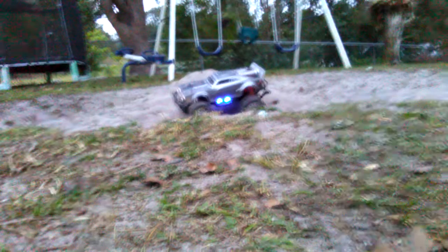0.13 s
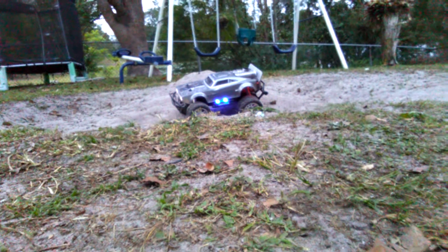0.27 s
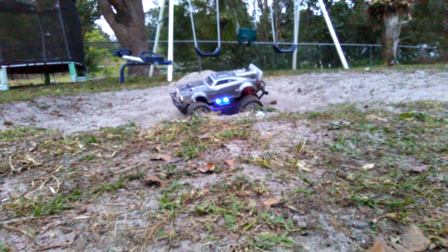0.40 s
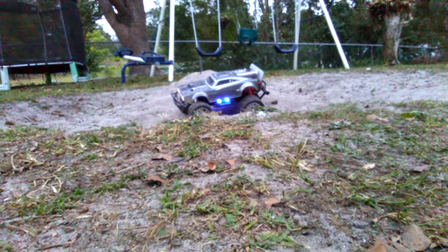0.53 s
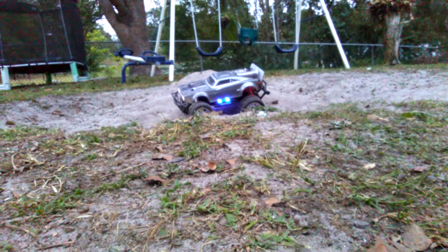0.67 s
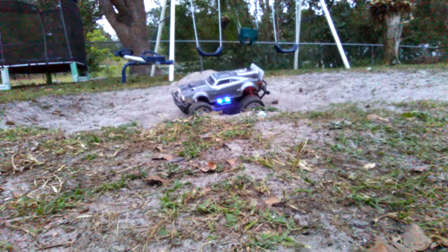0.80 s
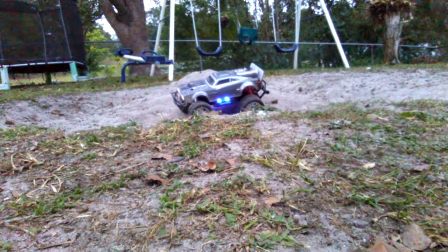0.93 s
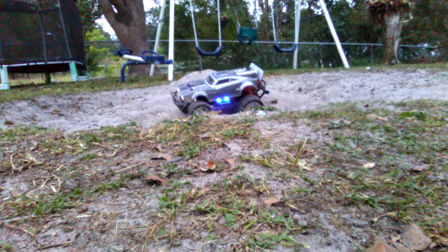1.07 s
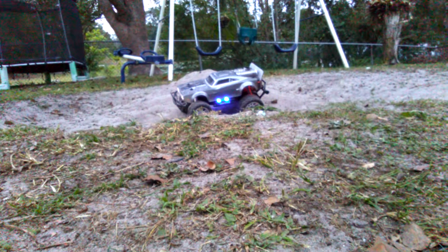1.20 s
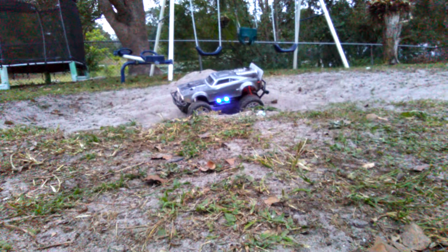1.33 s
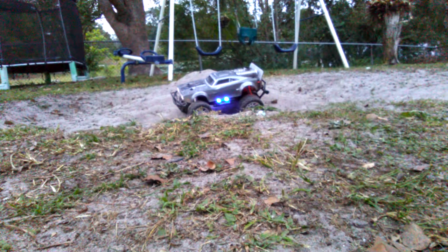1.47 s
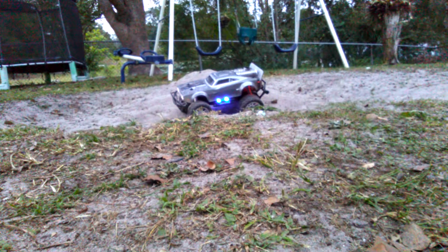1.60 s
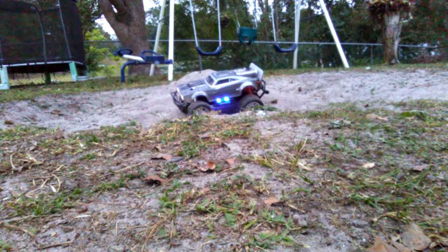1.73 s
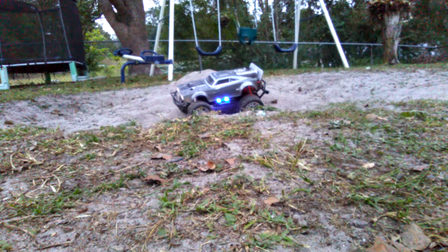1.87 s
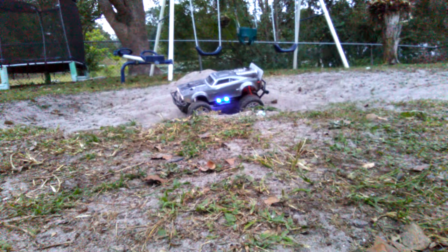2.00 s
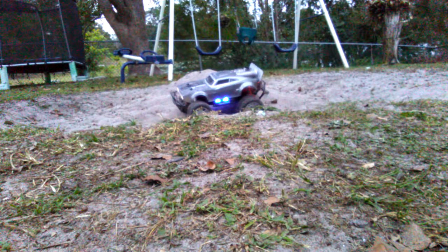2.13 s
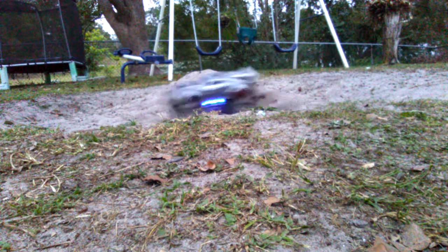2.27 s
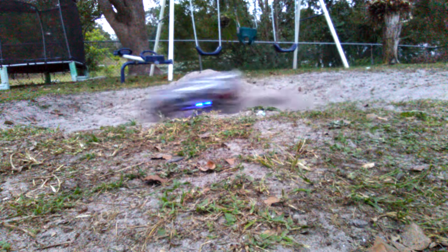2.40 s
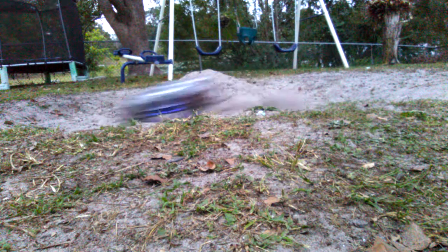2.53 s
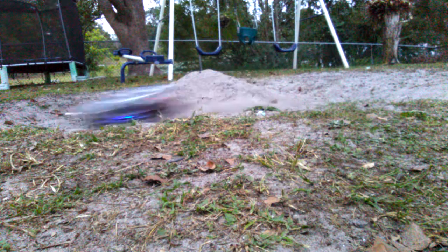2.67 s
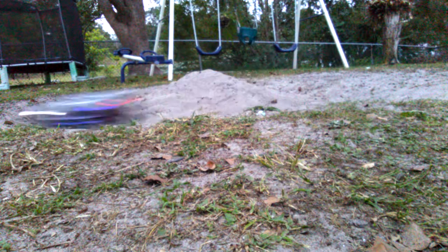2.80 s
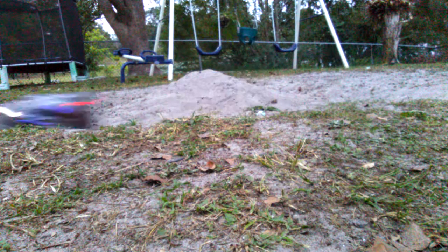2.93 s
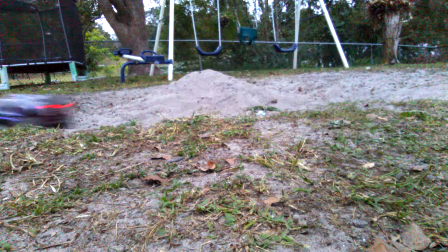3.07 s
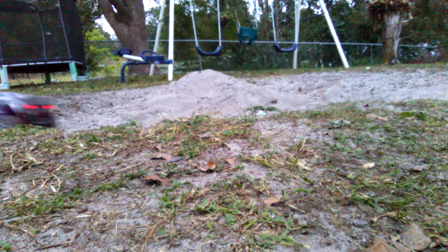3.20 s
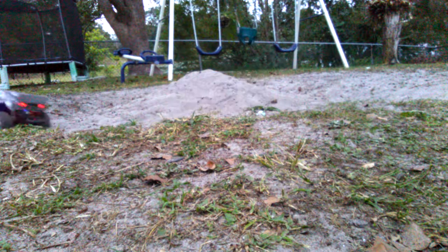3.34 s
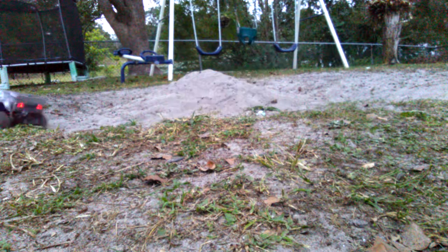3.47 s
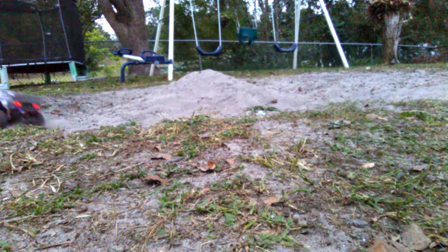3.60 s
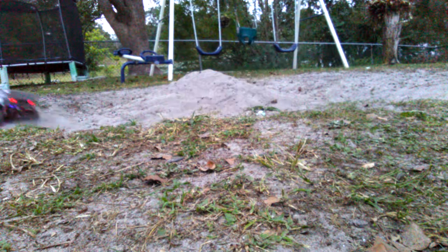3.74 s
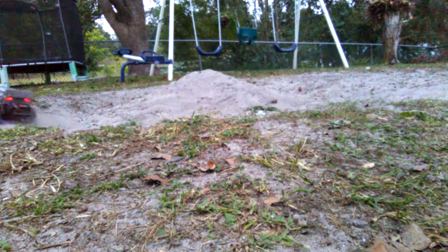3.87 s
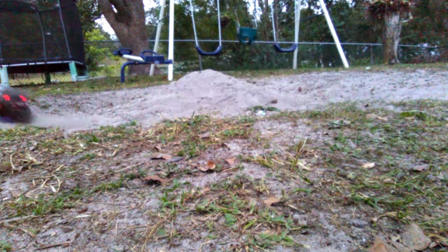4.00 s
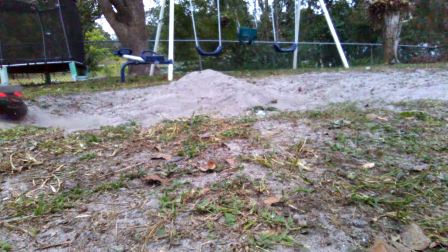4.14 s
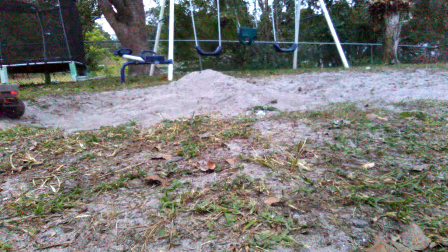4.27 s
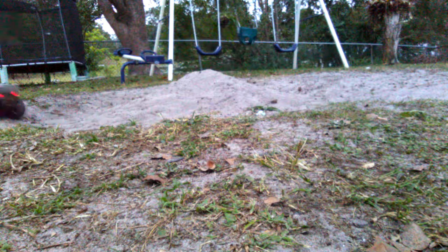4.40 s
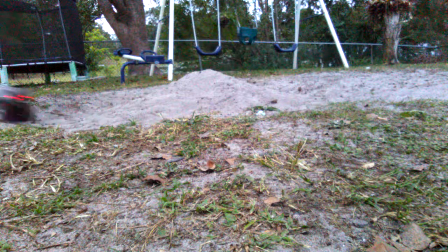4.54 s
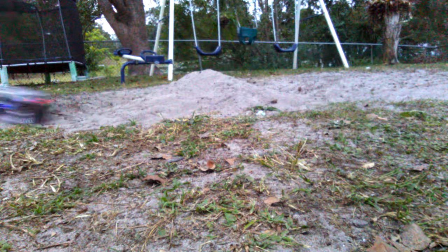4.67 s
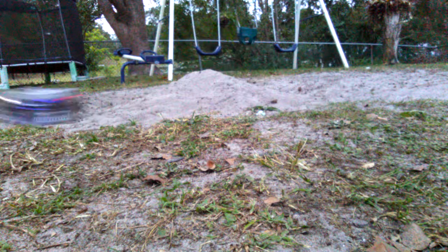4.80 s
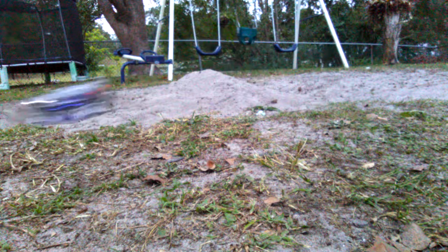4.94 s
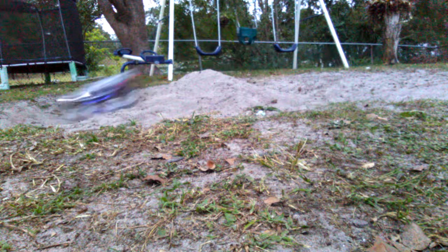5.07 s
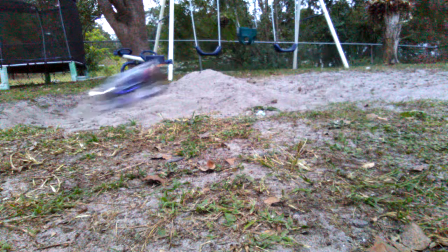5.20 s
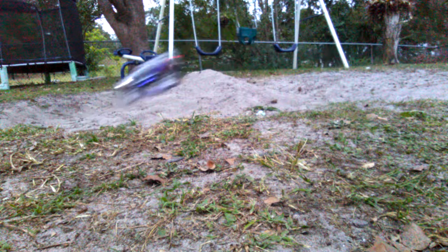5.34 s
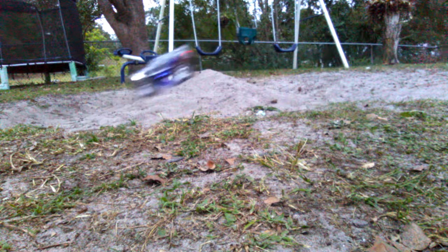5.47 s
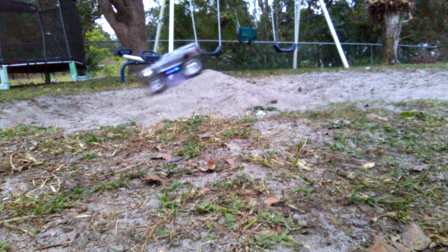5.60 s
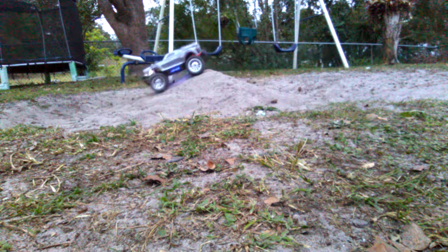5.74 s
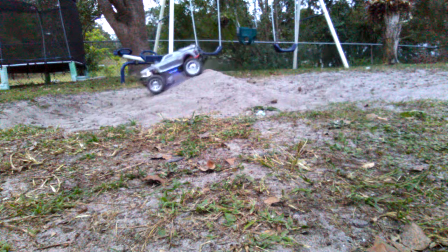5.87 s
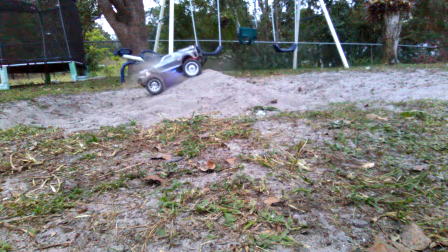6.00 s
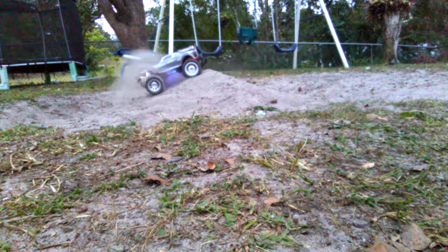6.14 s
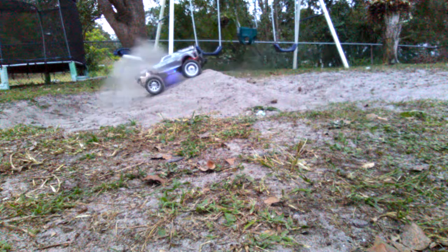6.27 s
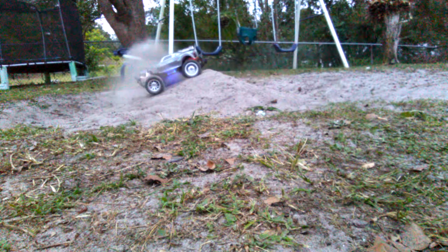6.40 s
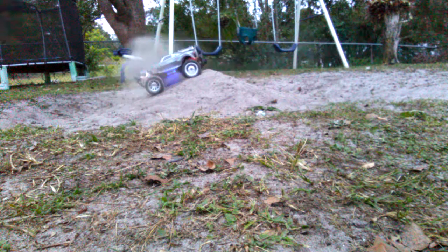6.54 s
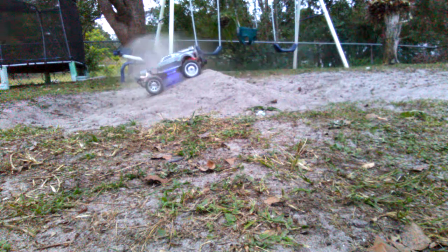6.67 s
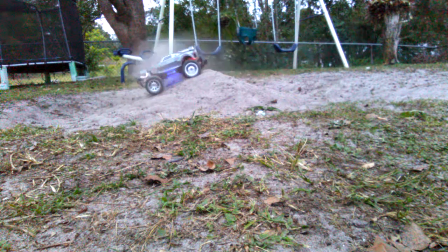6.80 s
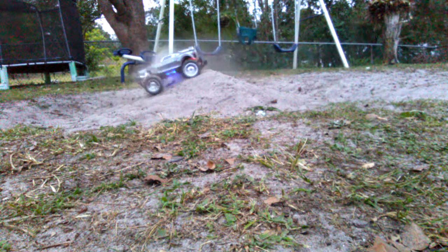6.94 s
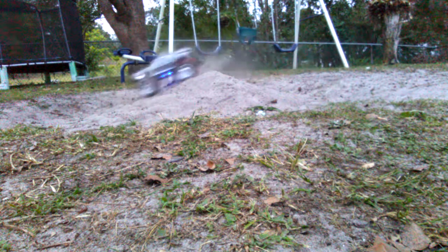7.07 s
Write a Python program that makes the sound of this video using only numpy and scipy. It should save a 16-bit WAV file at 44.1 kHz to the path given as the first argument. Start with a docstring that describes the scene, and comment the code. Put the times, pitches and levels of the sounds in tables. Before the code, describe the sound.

Outdoors in a quiet garden, a handheld camera's lens mechanism ticks rapidly and its plastic case clicks close by. Then a small electric toy truck bursts into a raspy, rising gear whine, coasts down, and revs again, five times in all. Tyres scrub and spray sand; finally the wheels race on a mound with throbbing rattle and hollow slaps. Wind buffets the stereo microphone late on.

```python
"""A toy electric truck spins its wheels through loose sand in five bursts and ends on a mound, wheels racing.
Its meshing gears are sums of swept overtones, narrow-band rasp and rattle that follow the motor's speed.
Coloured noise makes the tyres' scrub, slap and spray; delay and diffuse echoes place the truck outdoors.
Near at hand a camera's lens drive ticks and its plastic case clicks, as impulses exciting resonances.
Wind buffets the two microphone ports and the garden adds a steady hush, both from coloured noise."""
import sys
import numpy as np
from scipy import signal
from scipy.fft import rfft, irfft, next_fast_len
from scipy.io import wavfile
from scipy.ndimage import uniform_filter1d, map_coordinates

SR = 44100
rng = np.random.default_rng(int(sys.argv[2]) if len(sys.argv) > 2 else 0)


def to_wav(s):
    """Save 16-bit WAV."""
    ch = np.atleast_2d(s).T  # columns
    pcm = np.round(np.clip(ch, -1, 1) * 32767)  # PCM
    wavfile.write(sys.argv[1], SR, pcm.astype(np.int16))


N = 313992

# All levels in dB are relative: the functions add their own trims.

# The truck's five runs. Each row: throttle on in seconds, throttle off in seconds, slowing time constant
# in seconds, swell in dB per second, then drive, tyre scrub, sand spray and low gear note in dB.
RUNS = [(2.132, 2.837, 0.27, 3, -27.5, -45.5, -81, -45), (3.418, 3.999, 0.28, 5, -31.5, -45.5, -43, -46.5),
        (4.38, 5.582, 0.19, 6, -37.5, -45, -42, -53), (5.781, 6.822, .6, -12.5, -31, -43, -42.5, -47),
        (6.89, 7.118, 0.4, -12, -25, -45, -57, -52)]
# Motor speed under throttle, sagging where the tyres bite; one curve a run.
# Each row of a curve: time in seconds, gear mesh rate in Hz.
CRUISE = [
    [(2.25, 1658), (2.3, 1834), (2.32, 2088), (2.345, 2165), (2.375, 1983), (2.399, 2311), (2.42, 2382),
     (2.455, 1960), (2.495, 2234), (2.53, 2238), (2.585, 2449), (2.615, 2255), (2.675, 2314), (2.745, 1885),
     (2.82, 1754)],
    [(3.485, 1338), (3.52, 1396), (3.55, 1710), (3.605, 1862), (3.63, 2132), (3.662, 2153), (3.698, 1916),
     (3.722, 2198), (3.806, 2128), (3.86, 2445), (3.885, 2230), (3.915, 2270), (3.942, 2127)],
    [(4.455, 1467), (4.515, 1717), (4.6, 2127), (4.74, 2196), (4.82, 2290), (4.87, 2194), (5.03, 2398),
     (5.12, 2311), (5.28, 2370), (5.37, 2384), (5.43, 2180), (5.48, 2290), (5.525, 2340)],
    [(5.945, 2140), (6.01, 2359), (6.1, 2622), (6.56, 2875)],
    [(6.998, 1503), (7.04, 1745), (7.065, 1942), (7.093, 1970), (7.107, 2120)],
]
# How long the motor strains before it picks up. One value a run, in seconds.
STALL_S = [.027, .025, .015, .015, .048]
# How clearly the teeth sing, the harder they are pressed together. One value a run: whine re rattle in dB.
GRIP_DB = [7, 6, -11, -4, 6]
# Free wheelspin. Each row: time in seconds, share from 0 to 1.
SPIN = [(5.7, 0), (6.1, 0.7), (6.8, 1), (7, 0.29)]
# Overtones of the whine. Each row: multiple of the mesh rate, level in dB.
OVERTONES = [(2, 6), (3, 3.5), (4, -2), (5, -9), (6, -6)]
# How well the housing radiates an overtone sweeping past. Each row: frequency in Hz, gain in dB.
HOUSING_GAIN = [(2400, -26), (3650, -26), (3930, -10), (4200, -7), (4600, -8), (4900, -9.5), (5500, -6),
                (6200, -20), (7500, -35), (9000, -17), (11500, -34), (13500, -20)]
# High housing resonances set buzzing by hard-pressed teeth.
# Each row: frequency in Hz, width in Hz, level in dB.
BUZZ_MODES = [(6740, 500, 1), (8980, 370, 2.5), (10650, 800, -4.5), (13100, 1100, 0)]
# Colour of the gearbox rattle. Each row: frequency in Hz, level in dB.
GEARBOX_COLOUR = [(820, -41), (1400, -9), (1600, -69), (2260, -3.5), (2560, -19), (2830, -6.5),
                  (3540, -4.5), (4600, 4.5), (5380, 12), (5990, -8), (6410, -7), (10400, -19), (12000, -24),
                  (13700, -21), (14400, -30)]
# Colour of tyres scrubbing the ground. Each row: frequency in Hz, level in dB.
SCRUB_COLOUR = [(190, -6.5), (330, -10.5), (442, 3.5), (615, -3.5), (983, -2.5), (1460, -11), (1730, -18.5),
                (1900, -9.5), (2470, -17), (4180, -120)]
# Colour of tyres slapping the ground. Each row: frequency in Hz, level in dB.
SLAP_COLOUR = [(240, -42), (400, -34), (576, 3.5), (706, -0.5), (896, 4), (1080, -15), (1600, -20),
               (2080, -11), (3520, -120)]
# Colour of the flung sand. Each row: frequency in Hz, level in dB.
SPRAY_COLOUR = [(2500, -22), (5000, 10.5), (7500, 9.5), (10000, 4), (12500, 0), (14400, -51)]
# Racing tyres slap the mound. Each row: time in seconds, level in dB.
MOUND_SLAPS = [(5.947, -37.5), (6.04, -41), (6.241, -45), (6.274, -43), (6.318, -39), (6.351, -41),
               (6.424, -36), (6.462, -45), (6.499, -39), (6.576, -40.5), (6.601, -44), (6.665, -39.5),
               (6.708, -45), (6.765, -46), (6.808, -45), (6.909, -42.5), (6.947, -37)]
# The drive train takes up its slack. Each row: time in seconds, level in dB.
SLACK_CLACKS = [(2.139, -50), (3.442, -40), (4.418, -37), (5.79, -50), (6.932, -38)]
# Change of the truck's colour on the mound. Each row: frequency in Hz, gain in dB.
MOUND_COLOUR = [(1000, -1), (1500, -0.5), (2200, -6), (2900, 3), (3700, 5), (4400, 4), (5300, 2.5),
                (7000, 1), (13000, -0.5)]
# The truck's bearing. Each row: time in seconds, delay of the left port behind the right in samples.
BEARING = [(2.1, 1.9), (2.6, 3.6), (3.3, 8.55), (4.2, 11.06), (4.75, 8.84), (5.25, 5.5), (5.7, 2.64),
           (7.1, 2.87)]
# Moves of the lens drive. Each row: start in seconds, end in seconds, step in seconds,
# first tick in dB, following ticks in dB, ring re tick in dB.
LENS_MOVES = [(0.181, 0.2, .0355, -41, -41, 0), (0.219, 0.45, .0352, -37, -40, 0),
              (0.569, 0.66, .0372, -41, -37.5, 0), (0.682, 0.74, .037, -35, -37.5, 0),
              (0.7558, 1.18, .0368, -30.5, -39, -2), (1.193, 1.35, .035, -44, -43, -2),
              (1.367, 1.7, .0382, -36, -44.5, -1), (1.714, 2.93, .0382, -35, -45.5, 0),
              (2.942, 4.05, .0382, -38, -45, 0), (4.062, 4.15, .037, -35, -31, 5),
              (4.207, 4.38, .0342, -37, -39.5, 5)]
# Colour of a tick, shared by the clacks. Each row: frequency in Hz, level in dB.
TICK_COLOUR = [(1470, -55), (2500, -52), (3160, -22), (5000, -3.5), (5400, 4.5), (5930, -9), (8440, -9.5),
               (9480, -41), (10400, -19), (14400, -42)]
# Plastic clicks. Each row: time in seconds, then body, low knock, bright snap and lingering ring in dB.
CLICKS = [(0.1378, -47, -37, -19.5, -80), (0.1447, -62, -35.5, -47, -80), (1.09, -27, -53, -50, -62),
          (1.105, -29, -53, -55, -56), (1.125, -18.5, -54, -42, -56), (1.142, -24, -46, -44, -57),
          (1.754, -35, -69, -43, -80), (1.952, -40, -51, -51, -80), (1.969, -22, -35.5, -47, -63)]
# The plastic's resonances. Each row: frequency in Hz, width in Hz, level in dB.
PLASTIC_MODES = [(650, 350, -9), (970, 90, -5), (1200, 90, -9), (1770, 240, -3), (2780, 200, -10),
                 (4200, 350, 2)]
# The hard shell's bright resonances. Each row: frequency in Hz, width in Hz, level in dB.
SHELL_MODES = [(2600, 450, 2), (4020, 90, -9), (4650, 500, -7), (6500, 600, 2), (11500, 4000, -14)]
# Fingers settling on the case. Each row: time in seconds, rub in dB.
FINGERS = [(0, -47.5), (.2, -52.5), (.45, -58.5), (.6, -81)]
# A calm, then gusts. Each row: time in seconds, wind buffet in dB.
WIND_LEVEL = [(0, -57), (4.35, -55), (4.85, -40), (5.9, -37), (6.6, -51.5), (7.0, -42.5)]
# Colour of the wind buffet. Each row: frequency in Hz, level in dB.
BUFFET_COLOUR = [(12, -5), (20, 5), (49, 2.5), (129, -4), (325, -32.5), (450, -45), (580, -61), (990, -120)]
# Dull bumps on the microphone. Each row: time in seconds, level in dB.
BUMPS = [(4.886, -21.5), (4.897, -23), (5.178, -38), (5.428, -17.5), (5.543, -27.5), (5.66, -35.5),
         (5.861, -31.5), (5.919, -29), (6.041, -35)]
# Colour of the garden's hush. Each row: frequency in Hz, level in dB.
AIR_COLOUR = [(12, -47), (20, 1.5), (130, -5.5), (252, -8.5), (305, -16), (474, -12), (559, -16.5),
              (2340, -32.5), (4660, -32), (5350, -29), (10600, -41), (14400, -51)]
# Likeness of the hush at the two ports. Each row: frequency in Hz, left-right correlation.
AIR_ALIKE = [(60, 1), (140, 1), (300, 0.6), (700, 0.00074), (1500, 0)]
# The ports resonate differently. Each row: frequency in Hz, left minus right in dB.
PORTS = [(500, -0.5), (3600, 1.5), (4200, 1.5), (4800, 18), (5450, 10), (6200, 7), (7500, -4.5),
         (9300, 4.5), (12300, -1), (14000, -9)]

START_HZ, FULL_HZ = 743.5, 2305  # gear mesh rate as the truck jerks off, and the reference for full speed
BITE_HZ, BITE_WIDTH_HZ = 1935, 40  # above this mesh rate the gears dig in and sing
BITE_DRIVE_DB, BITE_WHINE_DB, BITE_SPRAY_DB = 3, 5, 3.5  # what each sound lacks below it
DRIVE_SLOPE_DB, SCRUB_SLOPE_DB, SPRAY_SLOPE_DB = 7, 2, 6  # growth with motor speed, dB per octave
GEAR_ATTACK_S, TYRE_ATTACK_S = 0.026, 0.023
GEAR_RELEASE_DB, TYRE_RELEASE_DB = 160, 100  # decay after the throttle is let go, dB per second
EASE_DB, EASE_S = 5, 0.014  # the gears unload as the motor starts to slow
COAST_DB, SLIP_DB = 11, 11  # whine lost when the motor coasts, and when the wheels spin free
RASP_DB, RATTLE_DB = -8.5, -1.5
RASP_RATE = 260  # knots per second per overtone number; more knots widen the rasp
CLEAR_HZ = 5900  # overtones above this lose their clear pitch
THROB_DB = 4.2  # swing of the throb at full wheelspin
SLAP_S = 0.0066  # time constant of a slap's bell-shaped envelope
TYRE_HZ, TYRE_RISE_HZ_PER_S = 871, 40  # the hollow tyre's note climbs as it stretches
CLIMB_AT_S, CLIMB_S = 5.07, 0.21  # start and length of the climb onto the mound
LENS_FADE_DB = 5  # softening of the ticks through a move, dB per second
RING_HZ, RING_T60 = 838, 0.3  # the case's lingering mode, and its decay in seconds
TOP_HZ = 14350  # band limit


def amp(db):
    """Level law: decibels to amplitude gain."""
    return 10 ** (np.asarray(db) / 20)


def unit(x):
    """Power normalisation: scale to rms 1."""
    return x / np.sqrt(np.mean(x ** 2) + 1e-20)


def along(points, hz):
    """Logarithmic frequency scale: interpolate (Hz, value) points along it."""
    f, v = np.transpose(points)
    return np.interp(np.log(hz + 1), np.log(f + 1), v)


def curves(rows):
    """Linear interpolation: one value per sample for each column after the time."""
    s, *cols = np.transpose(rows)
    return [np.interp(np.arange(N) / SR, s, c) for c in cols]


def wobble(rate):
    """Band-limited fluctuation: a smooth random curve with rate knots a second."""
    knots = rng.standard_normal(int(N * rate / SR) + 4)
    return map_coordinates(knots, [np.arange(N) * rate / SR])


def filtered(x, response):
    """Linear filtering: multiply the spectrum of x by a function of frequency."""
    m = next_fast_len(N + SR // 2)
    return irfft(rfft(x, m) * response(np.fft.rfftfreq(m, 1 / SR)), m)[..., :N]


def coloured(x, spectrum):
    """Spectral shaping: x with a (Hz, dB) colour, at rms 1."""
    return unit(filtered(x, lambda hz: amp(along(spectrum, hz))))


def noise(spectrum):
    """Random excitation: coloured noise of rms 1."""
    return coloured(rng.standard_normal(N), spectrum)


def ringing(x, modes):
    """Modal superposition: x through parallel (Hz, width in Hz, dB) resonances."""
    def response(f):
        return sum(amp(db) * 1j * f * width / (centre * centre - f * f + 1j * f * width)
                   for centre, width, db in modes)
    return filtered(x, response)


def bursts(times, levels_db, t60):
    """Exponential damping: jump at each time, then lose 60 dB in t60 seconds."""
    positions = np.clip(np.asarray(times) * SR, 0, N - 1).astype(int)
    hits = np.bincount(positions, amp(levels_db), N)
    return signal.lfilter([1], [1, -amp(-60 / (t60 * SR))], hits)


def diffuse_tail(t, t60):
    """Diffuse reflection: decaying noise, independent at each port."""
    return rng.standard_normal((2, len(t))) * amp(-60 * t / t60)


def scattered_by(x, tail):
    """Convolution with an echo tail of unit energy at each port."""
    tail = tail / np.linalg.norm(tail, axis=1, keepdims=True)
    return signal.fftconvolve(x[None], tail, axes=1)[:, :N]


def gears(jitter=.012, flutter_db=3.3, note_db=-1, shaft_db=-18.5, knock=0.36, chatter_db=1.5, buzz_db=-19):
    """Gear meshing: tooth contacts whine and rasp, and backlash rattles once a turn of the five-tooth pinion."""
    mesh_hz, level, grip, note = gear_controls()
    # play between the teeth scatters their timing, which blurs the high overtones into hiss
    slop = .17 * wobble(1400)
    # lightly pressed teeth run less evenly, so the whine breaks into strands
    uneven = jitter * np.clip(amp(-.7 * grip), .7, 2.2)
    mesh = 2 * np.pi * np.cumsum(mesh_hz * (1 + uneven * wobble(200))) / SR + slop
    shaft = mesh / 5
    # an off-centre pinion presses harder once a turn, which puts sidebands on the whine
    press = 1 + knock * np.cos(shaft)
    # a labouring motor makes the whine stutter
    stutter_db = 3.5 * below_speed(mesh_hz)

    def partial(k):
        """Amplitude modulation: a clear overtone that flutters, stutters and follows the press."""
        tone = unit(np.sin(k * mesh) * press * amp(flutter_db * wobble(130)))
        return tone * amp(stutter_db * (wobble(70) - 1.0))

    def rasp(k, rate):
        """Narrow-band noise: gritty teeth smear an overtone into a band that follows the motor."""
        return unit(np.sin(k * mesh) * wobble(rate) + np.cos(k * mesh) * wobble(rate))

    whine = np.zeros(N)
    for k, db in OVERTONES:
        clear = 1 / (1 + (k * mesh_hz / CLEAR_HZ) ** 12)
        singing = amp(grip) * clear * partial(k)
        rough = amp(RASP_DB + grip / 2) * rasp(k, k * RASP_RATE)
        whine += amp(db + along(HOUSING_GAIN, k * mesh_hz)) * (singing + rough)

    backlash = coloured(rng.standard_normal(N) * press * amp(chatter_db * wobble(300)), GEARBOX_COLOUR)
    rattle = amp(RATTLE_DB) * backlash * wheel_throb()
    buzz = ringing(rng.standard_normal(N) * press, BUZZ_MODES)
    buzz = amp(buzz_db + grip) * unit(filtered(buzz, lambda hz: hz > CLEAR_HZ))
    drive = amp(level) * (whine + buzz + rattle) / np.sqrt(1 + amp(grip) ** 2)

    # the rotor's imbalance hums at the shaft rate and its octave, growing steeply with speed
    hum = np.sin(shaft) + .25 * np.sin(2 * shaft)
    hum = unit(hum * amp(flutter_db * wobble(50)) * (1 + curves(SPIN)[0] * wobble(120)))
    hum = hum * np.clip(mesh_hz / 2100, 0, 1) ** 6
    # the low note, at the mesh rate itself, grows raspier with speed
    roughness = .9 * np.clip(mesh_hz / FULL_HZ, 0, 1) ** 2
    low = unit(partial(1) + roughness * rasp(0.95, 2 * RASP_RATE))
    return drive + amp(note + note_db) * low + amp(.5 * (level - 25.5) + shaft_db) * hum


def gear_controls():
    """Load and speed dependence: mesh rate in Hz, then drive, whine re rattle and low note in dB."""
    mesh_hz, eased = motor()
    spin, = curves(SPIN)
    age, released, swell, drive, _, _, note, grip = current_run()
    octaves = np.log2(mesh_hz / FULL_HZ)
    slow = below_speed(mesh_hz)
    attack = 20 * np.log10(1 - np.exp(-age / GEAR_ATTACK_S) + 1e-6)
    gate = attack - GEAR_RELEASE_DB * released - EASE_DB * eased
    drive_db = drive + swell * age + DRIVE_SLOPE_DB * octaves - BITE_DRIVE_DB * slow + gate
    whine_db = grip - BITE_WHINE_DB * slow - SLIP_DB * spin ** 4 - COAST_DB * eased
    note_db = note - COAST_DB * eased - SLIP_DB * spin + gate
    return mesh_hz, drive_db, whine_db, note_db


def motor():
    """Kinetic energy: steady power raises speed squared, then friction slows it; also throttle easing (0-1)."""
    t = np.arange(N) / SR
    mesh_hz, eased = np.full(N, float(START_HZ)), np.zeros(N)
    for (on, _, slowing_s, *_), stall_s, cruise in zip(RUNS, STALL_S, CRUISE):
        s, hz = np.transpose(cruise)
        energy = np.interp(t, [on + stall_s, s[0]], [0, 1])
        since = np.maximum(t - s[-1], 0)  # coasting begins at the end of the curve
        driven = np.sqrt(START_HZ ** 2 * (1 - energy) + np.interp(t, s, hz) ** 2 * energy)
        mesh_hz = np.where(t > on, driven * np.exp(-since / slowing_s), mesh_hz)
        eased = np.where(t > on, 1 - np.exp(-since / EASE_S), eased)
    return mesh_hz, eased


def current_run():
    """Throttle timing: seconds since it opened and since it closed, then the run's swell, levels and grip."""
    t = np.arange(N) / SR
    rows = np.column_stack([RUNS, GRIP_DB])
    latest = np.maximum(np.searchsorted(rows[:, 0], t) - 1, 0)
    on, off, _, *levels = rows[latest].T
    return np.maximum(t - on, 0), np.maximum(t - off, 0), *levels


def below_speed(mesh_hz):
    """Smooth threshold: 1 while the motor labours, falling to 0 past the speed at which the gears sing."""
    return (1 - np.tanh((mesh_hz - BITE_HZ) / BITE_WIDTH_HZ)) / 2


def wheel_throb():
    """Periodic modulation: freely spinning wheels, geared far down, bite the sand twice a turn."""
    mesh_hz, _ = motor()
    spin, = curves(SPIN)
    turns = np.cumsum(mesh_hz) / SR / 208  # tooth contacts per wheel turn
    return unit(amp(THROB_DB * spin * np.cos(4 * np.pi * turns)))


def sand(scrub_db=1.5, slap_db=-6.0, spray_db=-5, grain_db=4):
    """Frictional and impact noise: tyres scrub the ground, slap it when spinning free, and fling grains."""
    tyre, spray = tyre_controls()
    spin = np.clip(curves(SPIN)[0], 0, 1)
    scrub = amp(scrub_db) * unit(noise(SCRUB_COLOUR) * amp(2.34 * wobble(70)))
    slap = amp(slap_db) * noise(SLAP_COLOUR) * wheel_throb()
    contact = np.sqrt(1 - spin) * scrub + np.sqrt(spin) * slap
    graininess = amp(grain_db * wobble(2500) + 2.6 * wobble(60))
    grains = coloured(rng.standard_normal(N) * graininess, SPRAY_COLOUR)
    return amp(tyre) * contact + amp(spray + spray_db) * grains * wheel_throb()


def tyre_controls(scrub_ease_db=3, spray_ease_db=14):
    """Speed dependence of scrub and spray in dB: as the motor eases, spray falls much further than scrub."""
    mesh_hz, eased = motor()
    age, released, _, _, scrub, spray, *_ = current_run()
    octaves = np.log2(mesh_hz / FULL_HZ)
    gate = 20 * np.log10(1 - np.exp(-age / TYRE_ATTACK_S) + 1e-6) - TYRE_RELEASE_DB * released
    scrub = scrub + SCRUB_SLOPE_DB * octaves - scrub_ease_db * eased + gate
    spray = spray + SPRAY_SLOPE_DB * octaves - BITE_SPRAY_DB * below_speed(mesh_hz) - spray_ease_db * eased + gate
    return scrub, spray


def slaps(level_db=0, skin_db=-7):
    """Cavity resonance: each slap of a tyre on the mound sounds its hollow note and a puff of noise."""
    t = np.arange(N) / SR
    contact = sum(amp(db) * np.exp(-.5 * ((t - s) / SLAP_S) ** 2) for s, db in MOUND_SLAPS)
    note_hz = TYRE_HZ + TYRE_RISE_HZ_PER_S * (t - MOUND_SLAPS[0][0]) + 28 * wobble(120)
    hollow = unit(np.sin(2 * np.pi * np.cumsum(note_hz) / SR))
    return amp(level_db) * contact * (hollow + amp(skin_db) * noise(SLAP_COLOUR))


def clacks(knock_db=-2, snap_db=0):
    """Impact of backlash: the drive train takes up its slack with a clack at the start of each run."""
    s, peak = np.transpose(SLACK_CLACKS)
    snap, knock = bursts(s, peak, t60=0.06), bursts(s, peak, t60=0.12)
    resonance = unit(ringing(rng.standard_normal(N), [(3810, 500, 0)]))
    teeth = unit(noise(TICK_COLOUR) + resonance)
    return amp(snap_db) * teeth * snap + amp(knock_db) * noise(SCRUB_COLOUR) * knock


def on_mound(x):
    """Radiation: the colour changes as the truck climbs the mound and bares its underside."""
    climbed = np.clip((np.arange(N) / SR - CLIMB_AT_S) / CLIMB_S, 0, 1)
    return (1 - climbed) * x + climbed * filtered(x, lambda hz: amp(along(MOUND_COLOUR, hz)))


def outdoors(x):
    """Arrival-time difference and scattering: sound reaches the ports in turn; the ground scatters treble."""
    scatter_db, t60 = -5.5, .04
    lag, = curves(BEARING)
    direct = np.array([map_coordinates(x, [np.arange(N) - side * lag / 2], order=5) for side in (1, -1)])
    tail = diffuse_tail(np.arange(SR // 10) / SR, t60)
    scattered = filtered(scattered_by(x, tail), lambda hz: hz / (hz + 700))
    # the scattered paths keep changing as the truck moves
    return direct + amp(scatter_db) * scattered * np.array([wobble(45), wobble(45)])


def trees(x, echo_db=-11, t60=0.4):
    """Diffuse reflection: trunks and fence return a faint echo, different at each port."""
    t = np.arange(SR // 3) / SR
    tail = diffuse_tail(t, t60) * np.clip(t / 0.0096, 0, 1)  # the echo builds up gradually
    return amp(echo_db) * filtered(scattered_by(x, tail), lambda hz: hz / (hz + 900))


def lens_drive(tick_db=-11, ring_db=4.5, thud_db=-51.0, scatter_db=2.0, right_db=0.5):
    """Repeated impact: each step, about 27 a second, gives a tick, a short ring and a thud in the case."""
    times, levels, rings = [], [], []
    for start, end, step_s, first_db, later_db, sings_db in LENS_MOVES:
        age = np.arange(step_s, end - start, step_s)
        later = later_db - LENS_FADE_DB * age + scatter_db * rng.standard_normal(len(age))
        times = np.concatenate([times, [start], start + age])
        levels = np.concatenate([levels, [first_db], later])
        rings = np.concatenate([rings, np.full(len(age) + 1, sings_db)])
    # a short contact and a weak long tail, their onsets rounded over 130 samples
    strike = bursts(times, levels + tick_db, t60=0.014) + bursts(times, levels - 23.0, t60=0.23)
    strike = uniform_filter1d(strike, size=130)
    ring_level = uniform_filter1d(bursts(times, levels + rings + ring_db, t60=0.028), size=130)
    ring = ringing(rng.standard_normal((2, N)) * ring_level, [(5450, 170, 0)])
    thud = ringing(bursts(times, np.zeros(len(times)), t60=0.013), [(57.8, 5.2, 0), (125.7, 24.0, 1)])
    ticks = strike * np.array([noise(TICK_COLOUR), noise(TICK_COLOUR)])
    return (ticks + ring) * amp([[-right_db], [right_db]]) + amp(thud_db) * unit(thud)


def clicks(body_db=5, knock_db=4, snap_db=-1, dull_hz=3250):
    """Modal excitation: plastic parts snap, ring hollow and knock low; fingers rub the case at first."""
    s, peak, knock, snap, linger = np.transpose(CLICKS)

    def partly_shared():
        """Partial coherence: noise with a part common to both ports."""
        return rng.standard_normal((2, N)) + rng.standard_normal(N)

    blows = partly_shared() * (bursts(s, peak + body_db, t60=0.029) + bursts(s, peak - 15, t60=0.2))
    body = filtered(ringing(blows, PLASTIC_MODES), lambda hz: 1 / (1 + (hz / dull_hz) ** 10))
    case = unit(ringing(ringing(rng.standard_normal(N), [(403, 57, 0)]), [(565, 136, 0)]))
    knocks = case * bursts(s, knock + knock_db, t60=0.04)
    friction = unit(ringing(ringing(rng.standard_normal(N), [(320, 140, 0)]), [(318, 450, 0)]))
    rub = amp(curves(FINGERS)[0]) * friction
    snaps = ringing(partly_shared() * bursts(s, snap + snap_db, t60=0.015), SHELL_MODES)
    ring = np.sin(2 * np.pi * RING_HZ * np.arange(N) / SR) * bursts(s, linger, t60=RING_T60)
    return body + ring + knocks + rub + snaps


def wind(buffet_db=8.5, lumps_db=3, bump_db=8.5, tumble_db=-13):
    """Turbulent pressure: gusts buffet the ports partly alike, the left one more; dull bumps rumble on."""
    level, = curves(WIND_LEVEL)
    shared = noise(BUFFET_COLOUR)
    ports = np.array([unit((noise(BUFFET_COLOUR) + .7 * shared) * amp(lumps_db * wobble(22)))
                      for _ in range(2)])
    s, peak = np.transpose(BUMPS)
    bumps = ringing(bursts(s, peak + bump_db, t60=0.04), [(134.7, 115.0, 0.57), (221.8, 83.5, -0.84)])
    rumble = unit(ringing(noise(BUFFET_COLOUR), [(190, 140, 0)]))
    tumble = rumble * bursts(s, peak + tumble_db, t60=0.45)
    return amp(level + buffet_db) * ports * amp([[2], [-1.5]]) + (bumps + tumble) * amp([[3], [-5]])


def air(level_db=-51):
    """Spatial coherence: the garden's steady hush is alike at both ports in the bass."""
    def turn(hz):
        """Mixing angle whose double has the wanted correlation as its cosine."""
        return np.arccos(np.clip(along(AIR_ALIKE, hz), -1, 1)) / 2

    mid = filtered(noise(AIR_COLOUR), lambda hz: np.cos(turn(hz)))
    side = filtered(noise(AIR_COLOUR), lambda hz: np.sin(turn(hz)))
    return amp(level_db + 0.18 * wobble(8.0)) * np.array([mid + side, mid - side])


def scene():
    """Superposition: the truck in the garden, the camera's own small noises, wind and air."""
    truck = on_mound(gears() + sand() + slaps() + clacks())
    return outdoors(truck) + trees(truck) + lens_drive() + clicks() + wind() + air()


def record(dry):
    """Port resonance: each port colours the treble in its own way, and nothing passes the band limit."""
    def response(hz):
        """Left and right gains: the ports' balance, then a gentle treble lift common to both."""
        ratio = amp(along(PORTS, hz))
        balance = np.array([ratio, np.ones_like(hz)]) * np.sqrt(2 / (1 + ratio ** 2))
        lift = amp(along([(1000, -1), (4500, 2.0), (14000, 0.5)], hz))  # Hz, dB
        return balance * (hz < TOP_HZ) * lift
    return filtered(dry, response)


dry = scene()
out = record(dry)
to_wav(out)
```